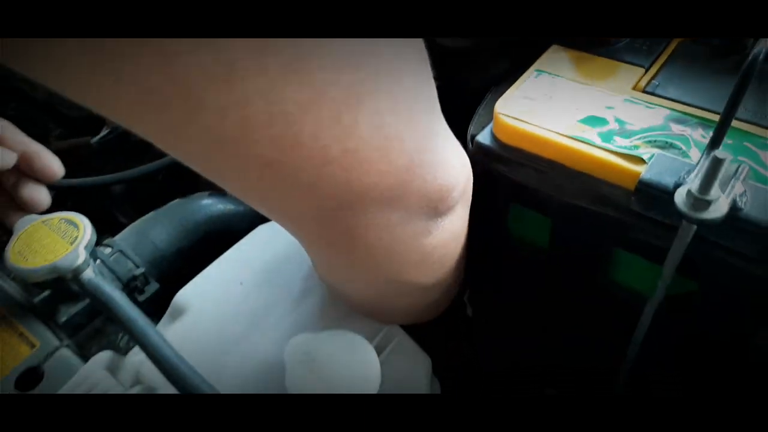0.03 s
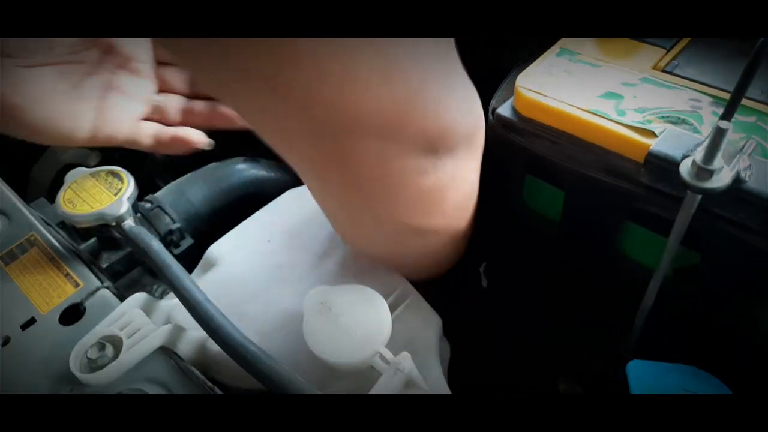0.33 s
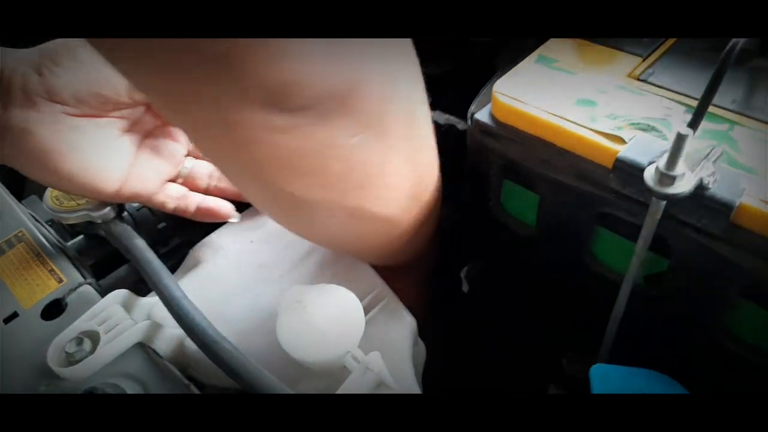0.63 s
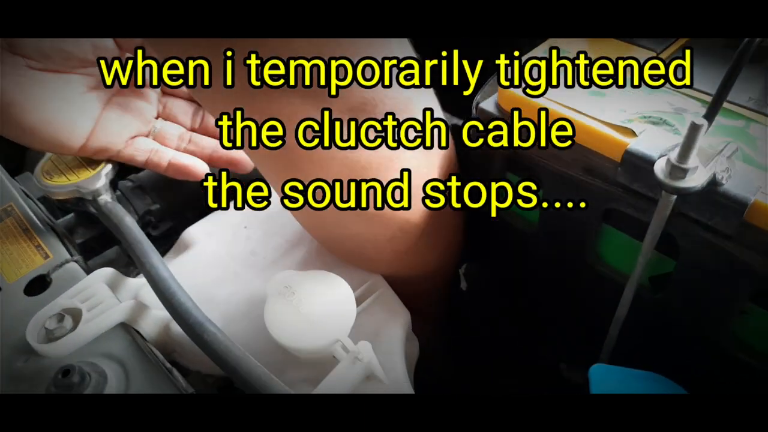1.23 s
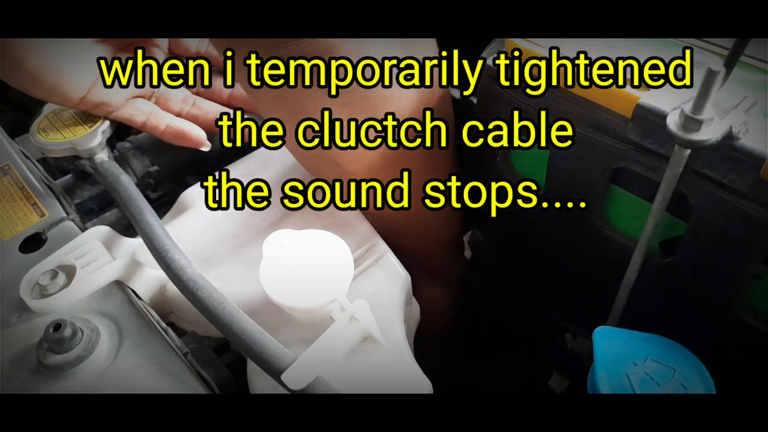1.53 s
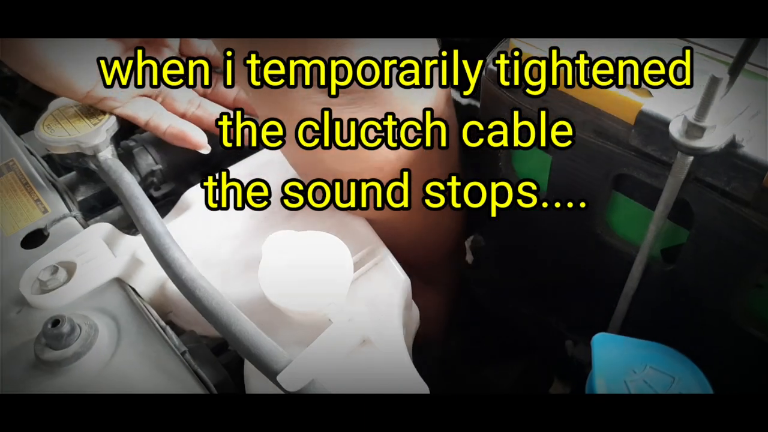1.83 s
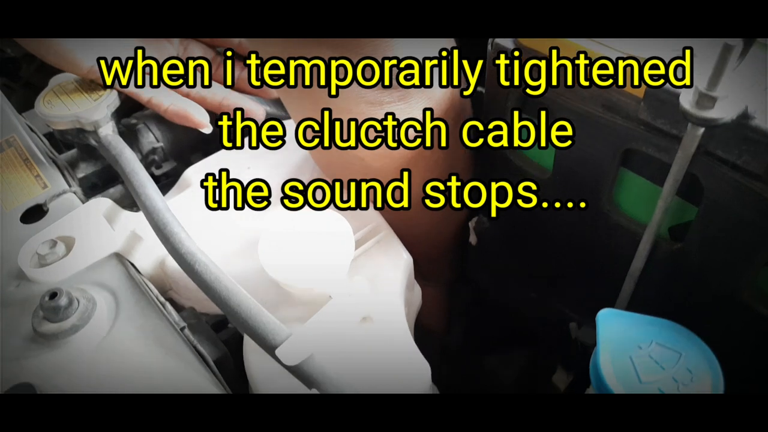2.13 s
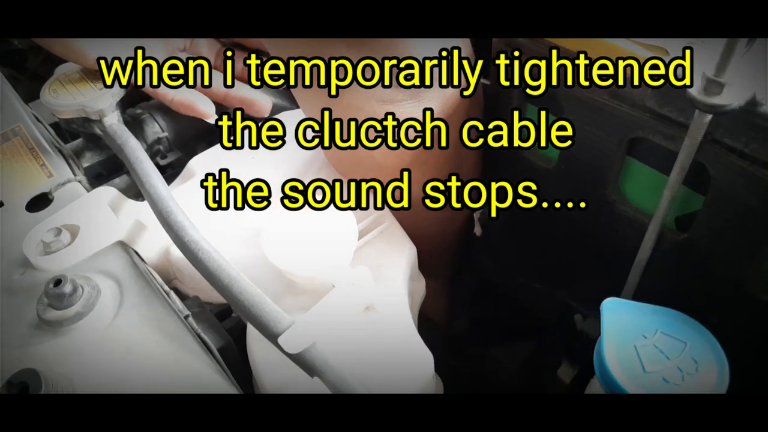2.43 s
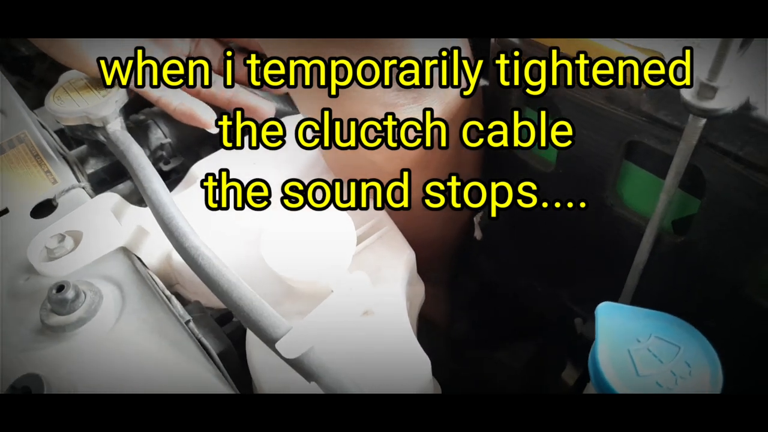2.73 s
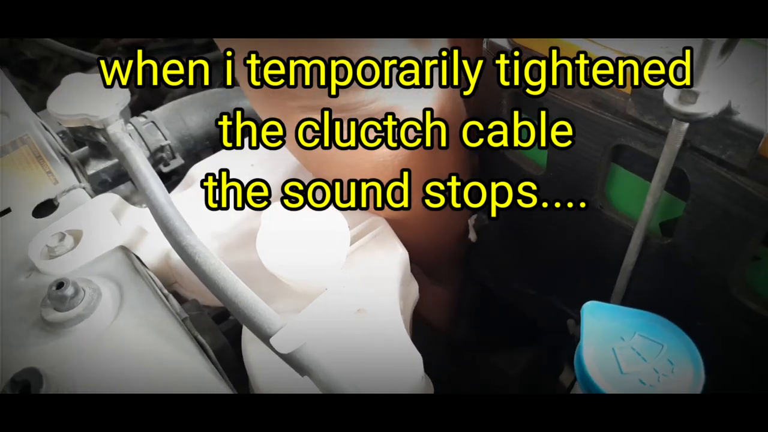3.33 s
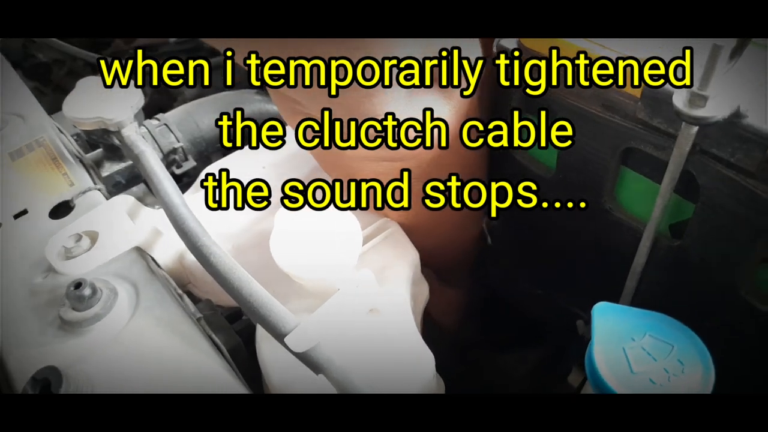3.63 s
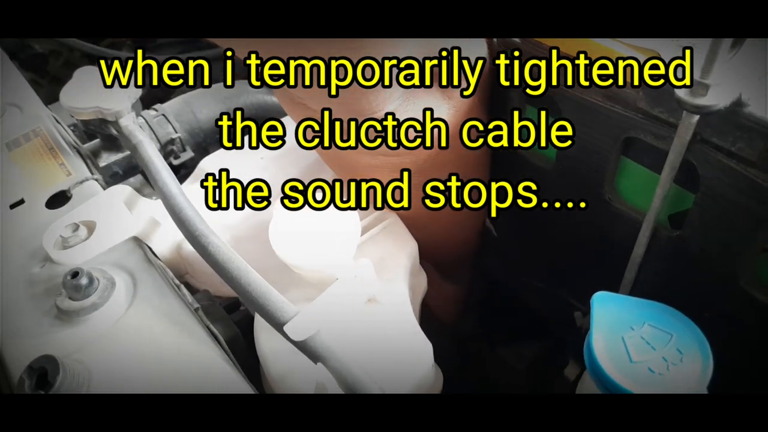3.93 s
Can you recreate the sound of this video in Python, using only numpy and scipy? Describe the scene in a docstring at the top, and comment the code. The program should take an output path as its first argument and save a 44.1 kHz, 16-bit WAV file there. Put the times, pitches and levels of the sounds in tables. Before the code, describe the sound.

Shrill squeal and hiss from an idling car engine stop, then chirp back for a moment.

```python
"""A small car engine idles under the open bonnet, close by: it hums, and rumbles and ticks at the
firing rate. From the start, friction in a dry bearing, probably the clutch's, sustains a squeal
near 3.7 kHz that flutters with every turn of the crank. Its rubbing hiss grows and changes colour
as the listener moves further over the engine. At about 2.6 s the cable is pulled tight and squeal
and hiss die away; near 3.6 s they return for a moment, and the engine idles on."""
import sys
import numpy as np
from scipy import signal
from scipy.fft import rfft, irfft
from scipy.io import wavfile
from scipy.ndimage import uniform_filter1d

SR = 44100
rng = np.random.default_rng(int(sys.argv[2]) if len(sys.argv) > 2 else 0)


def pcm_store(signal):
    """Save signal as 16-bit PCM."""
    levels = np.round(np.clip(np.atleast_2d(signal), -1, 1) * 32767)
    wavfile.write(sys.argv[1], SR, levels.astype(np.int16).T)


N = 176400

# Rotation rate of the crank: time_s, rate_hz
CRANK_RATE = [(0, 15.12), (.7, 15.06), (1.1, 14.88), (2.0, 14.84), (3.0, 14.95), (4.0, 14.95)]
# Envelope of the squeal: time_s, gain_db
SQUEAL_ENVELOPE = [(0, -26.5), (.5, -29.5), (.8, -25.5), (1.22, -24.5), (1.7, -24.5), (2.1, -27),
                   (2.48, -28.5), (2.55, -24), (2.59, -38.5), (2.65, -46), (2.8, -74), (3.54, -74),
                   (3.568, -34), (3.6, -27.5), (3.625, -33), (3.65, -27), (3.695, -39), (3.73, -31.5),
                   (3.775, -49), (3.87, -66)]
# Relative weights of the lines around the squeal's pitch: offset_in_crank_rates, left_db, right_db
SQUEAL_SIDEBANDS = [(-22, -29, -31), (-16, -17, -21), (-13, -21, -21), (-12, -16, -16), (-10, -21, -19),
                    (-9, -7, -9), (-8, -13, -15), (-7, -15, -18), (-6, -1, -5), (-5, -12, -12),
                    (-4, -10, -7), (-3, -11, -8), (-2, -3, -2), (-1, -14, -13), (0, -2, 0), (1, -3, -1),
                    (2, -21, -20), (3, -20, -11), (4, -18, -7), (5, -24, -16), (6, -22, -24), (8, -19, -20),
                    (13, -29, -28), (16, -23, -22), (18, -32, -30)]
# Moments when the bearing catches hardest: centre_s, pitch_hz, width_hz, level_db, half_length_s
BEARING_SCRAPES = [(1.217, 5050, 1100, -41.5, 0.15), (2.537, 5500, 250, -50, .009),
                   (3.603, 5520, 250, -42, .009)]
# Envelope of the rubbing hiss: time_s, gain_db
HISS_ENVELOPE = [(0, -43), (.85, -42), (1.2, -38.5), (1.6, -36.5), (2.25, -34.5), (2.48, -37), (2.55, -32),
                 (2.63, -52), (3.0, -75), (3.45, -50), (3.55, -44.5), (3.6, -37), (3.66, -40.5),
                 (3.74, -44), (3.82, -65)]
# Balance of the hiss: time_s, left_minus_right_db
HISS_BALANCE = [(0, -11.5), (.9, -7.5), (1.5, 2), (4, 2)]
# Spectra of the hiss before and after the listener moves: frequency_hz, relative_density_db
HISS_SPECTRUM_BEFORE = [(1500, -18), (3000, 1), (4200, -2), (4900, 5.5), (5250, -6), (5550, 2), (6400, -31),
                        (7300, 5), (8250, -9), (9200, 0.5), (12000, -2.5), (13800, -0.5), (15500, -21)]
HISS_SPECTRUM_AFTER = [(1500, 3), (3000, -1), (4200, 0), (4850, 6), (5250, -1), (5600, 5), (5900, -4.5),
                       (6200, 7), (6600, -5), (7300, 9), (8200, -9), (9200, 2), (12000, -2), (13800, 2.5),
                       (15500, -7.5)]
# Progress of that move: time_s, power_share_after
LISTENER_MOVE = [(1.0, 0.088), (1.6, 1)]
# Swelling and sinking of the main hum: time_s, level_db
HUM_ENVELOPE = [(0.0, -22), (0.02, -21.5), (0.58, -18.5), (1.05, -21.5), (1.18, -19), (1.49, -18.5),
                (1.71, -21.5), (2.21, -19.5), (2.52, -23.5), (2.88, -17.5), (3.51, -21.5), (3.54, -18.5),
                (3.97, -17), (4.0, -15.5)]
# Weaker tones of the engine and its fan: pitch_hz, level_db, left_minus_right_db, unsteady_share
ENGINE_TONES = [(67.2, -43, 17, 0.21), (112.6, -41, 17, .5), (156.2, -37, 0, 0.28), (181.4, -30, 5, 0.11),
                (243, -38.5, 6.5, 0.37), (307.6, -32.5, 15, 0.13), (458.6, -47, 5, 0.36),
                (614, -54, 8, 0.21), (1772, -58, 5, 0.3)]
# Spectra of the engine's rumble and of the valve gear's clatter: frequency_hz, relative_density_db
RUMBLE_SPECTRUM = [(25, -30), (42, -17), (60, -4), (80, -4), (130, 1), (190, -3.5), (280, -4.5),
                   (360, -10.5), (480, -14), (650, -18.5), (850, -18.5), (1100, -23), (1600, -22),
                   (2200, -21.5), (3000, -33.5), (4500, -52.5)]
CLATTER_SPECTRUM = [(1200, -9), (2500, 4.5), (3900, 4.5), (5200, -1), (7000, 2), (7900, -3), (8800, -15.5),
                    (10500, -7.5), (15000, -5.5)]
# Balance of rumble and clatter: frequency_hz, left_minus_right_db
ENGINE_BALANCE = [(60, -3), (110, 0.5), (200, 4), (380, 5), (690, 2), (1280, 4.5), (2360, 2), (4360, 4.5),
                  (8040, 5), (14800, 1.5)]
# Likeness of the broadband noises at the two ears: frequency_hz, correlation
EAR_CORRELATION = [(60, .99), (130, .98), (290, 0.93), (640, 0.49), (1400, -0.2), (3000, 0.031),
                   (15000, -0.036)]

SQUEAL_HZ, HUM_HZ, CUTOFF_HZ = 3705.3, 91.24, 15500
FIRINGS_PER_TURN = 1.5
FIRST_GRIP_S, FIRST_HISS_CREST_S, FIRST_TICK_S = 0.04314, 0.042, 0.028
PHASE_SCATTER_RAD = (2.4, 1.56)   # of the sidebands: left, right
EVENNESS, EVEN_OVER_S = 0.35, 0.008
GRIP_RISE_TURNS, GRIP_DEPTH_DB, GRIP_UNEVEN_DB = 0.14, 4.0, 0.73
RASP_DB, OCTAVE_DB, OCTAVE_RASP_DB = -9, -33.5, -35.5   # relative to the squeal's tone
HISS_FLUTTER_DEPTH = 0.14
RUMBLE_DB, THROB_DEPTH = -24.5, 0.083
CLATTER_DB, TICK_DEPTH, TICK_SHARPNESS = -40.5, 0.66, 2


def bearing_squeal():
    """Self-excited vibration: dry friction sustains a tone and its octave, each with a noisy rasp."""
    tone = bearing_tone()
    white = rng.standard_normal((2, 2, N))
    rasp = from_db(RASP_DB) * resonant_band(white[0], 3672, 3716, width_hz=233)
    octave = from_db(OCTAVE_DB) * unit_power((tone ** 2).real)
    octave_rasp = from_db(OCTAVE_RASP_DB) * resonant_band(white[1], 7360, 6860, width_hz=100)
    voice = unit_power(tone.real) + rasp + octave + octave_rasp
    return from_db(in_time(SQUEAL_ENVELOPE)) * bearing_grip() * voice


def bearing_tone():
    """Periodic modulation splits a tone into sidebands spaced at the crank rate; complex, stereo."""
    turn = np.exp(1j * crank_angle(FIRST_GRIP_S))
    orders, left_db, right_db = np.transpose(SQUEAL_SIDEBANDS)
    line = carrier(SQUEAL_HZ) * turn ** int(orders[0])
    tone = np.zeros((2, N), complex)
    for order in np.arange(orders[0], orders[-1] + 1):
        wandering = line * (1 + 0.34 * drift(rate_hz=1.25))
        for ear, weights_db in enumerate((left_db, right_db)):
            weight = from_db(np.interp(order, orders, weights_db))
            phase = PHASE_SCATTER_RAD[ear] * rng.normal()
            tone[ear] += wandering * weight * np.exp(1j * phase)
        line = line * turn   # one crank rate higher
    # Friction partly evens out the amplitude.
    power = uniform_filter1d(np.abs(tone) ** 2, int(EVEN_OVER_S * SR))
    relative_power = power / power.mean(axis=1, keepdims=True)
    return unit_power(tone / relative_power ** (EVENNESS / 2))


def bearing_grip():
    """Amplitude modulation: on each turn the grip rises quickly and releases slowly, a bit unevenly."""
    turn_fraction = crank_angle(FIRST_GRIP_S) / (2 * np.pi) % 1
    slack = np.interp(turn_fraction, [0, 1 - GRIP_RISE_TURNS, 1], [0, 1, 0])
    return from_db(-GRIP_DEPTH_DB * slack + GRIP_UNEVEN_DB * drift(rate_hz=3.5).real)


def bearing_scrapes():
    """Forced resonance: a higher mode of the bearing swells briefly where it catches hardest."""
    t, scrapes = np.arange(N) / SR, 0
    for centre_s, pitch_hz, width_hz, level_db, half_length_s in BEARING_SCRAPES:
        ringing = resonant_band(rng.standard_normal((2, N)), pitch_hz, pitch_hz, width_hz)
        swell = np.exp(-((t - centre_s) / half_length_s) ** 2)
        scrapes = scrapes + from_db(level_db) * swell * ringing
    return scrapes


def bearing_hiss():
    """Sliding friction radiates broadband noise, cresting once a turn; its colour depends on position."""
    once_a_turn = np.cos(crank_angle(FIRST_HISS_CREST_S))
    flutter = 1 + HISS_FLUTTER_DEPTH * once_a_turn + 0.2 * drift(rate_hz=36).real
    moved = in_time(LISTENER_MOVE)
    before = np.sqrt(1 - moved) * stereo_noise(HISS_SPECTRUM_BEFORE)
    after = np.sqrt(moved) * stereo_noise(HISS_SPECTRUM_AFTER)
    return from_db(in_time(HISS_ENVELOPE)) * pan(in_time(HISS_BALANCE)) * flutter * (before + after)


def engine_hum():
    """Periodic motion of engine and fan gives a line spectrum: a main hum and weaker wavering tones."""
    main_tone = carrier(HUM_HZ) * (1 + 0.056 * drift(rate_hz=1.3))
    hum = from_db(in_time(HUM_ENVELOPE)) * pan(balance_db=3.5) * main_tone.real
    for pitch_hz, level_db, balance_db, unsteady in ENGINE_TONES:
        tone = carrier(pitch_hz) * (1 - unsteady + unsteady * drift(rate_hz=2.0))
        hum = hum + from_db(level_db) * pan(balance_db) * unit_power(tone).real
    return np.sqrt(2) * hum   # the real part carries half the power


def engine_noise():
    """Noise modulated at the firing rate: the rumble throbs and the valve gear ticks."""
    firing = np.cos(FIRINGS_PER_TURN * crank_angle(FIRST_TICK_S))
    throb = 1 + THROB_DEPTH * firing
    ticks = unit_power(1 + TICK_DEPTH * np.exp(TICK_SHARPNESS * (firing - 1)))
    rumble = from_db(RUMBLE_DB) * throb * stereo_noise(RUMBLE_SPECTRUM, ENGINE_BALANCE)
    clatter = from_db(CLATTER_DB) * ticks * stereo_noise(CLATTER_SPECTRUM, ENGINE_BALANCE)
    return rumble + clatter


def crank_angle(zero_s):
    """Phase is the integral of rate: the crank's angle in radians, passing zero near zero_s."""
    rate_hz = in_time(CRANK_RATE)
    return 2 * np.pi * (np.cumsum(rate_hz) / SR - zero_s * rate_hz[0])


def carrier(hz):
    """Simple harmonic motion as a rotating phasor with a random starting phase."""
    return np.exp(2j * np.pi * (hz * np.arange(N) / SR + rng.random()))


def drift(rate_hz):
    """Low-pass filtered noise gives a slow complex fluctuation of unit power."""
    step = 100   # samples between computed points
    pole, count = np.exp(-2 * np.pi * rate_hz * step / SR), N // step + 2
    white = rng.standard_normal((2, 2 * count))
    real, imaginary = signal.lfilter([1], [1, -2 * pole, pole * pole], white)[:, count:]
    return np.interp(np.arange(N) / step, np.arange(count), unit_power(real + 1j * imaginary))


def resonant_band(x, narrow_hz, broad_hz, width_hz):
    """Two damped resonators in series, the second twice as wide, pass a band scaled to unit power."""
    for hz, bandwidth_hz in ((narrow_hz, width_hz), (broad_hz, 2 * width_hz)):
        radius = np.exp(-np.pi * bandwidth_hz / SR)
        feedback = [1, -2 * radius * np.cos(2 * np.pi * hz / SR), radius * radius]
        x = signal.lfilter([1, 0, -1], feedback, x)
    return unit_power(x)


def stereo_noise(spectrum, balance=None):
    """Interaural correlation: coloured noise of unit power, alike at both ears in the bass only."""
    hz = np.fft.rfftfreq(N, 1 / SR) + 1
    mid, side = rfft(rng.standard_normal((2, N)))
    correlation = at_hz(EAR_CORRELATION, hz)
    ears = np.sqrt(1 + correlation) * mid + np.sqrt(1 - correlation) * side * [[1], [-1]]
    if balance is not None:
        ears = ears * pan(at_hz(balance, hz))
    coloured = ears * from_db(at_hz(spectrum, hz)) * (hz < CUTOFF_HZ)
    return unit_power(irfft(coloured, N))


def pan(balance_db):
    """Interaural level difference, left minus right, as a pair of gains."""
    return from_db(np.array([[.5], [-.5]]) * balance_db)


def in_time(rows):
    """Linear interpolation of (time_s, value) rows at every sample."""
    return np.interp(np.arange(N) / SR, *np.transpose(rows))


def at_hz(rows, hz):
    """Interpolation of (frequency_hz, value) rows on a logarithmic frequency axis."""
    frequency_hz, value = np.transpose(rows)
    return np.interp(np.log(hz), np.log(frequency_hz), value)


def from_db(db):
    """Decibels as an amplitude ratio."""
    return 10 ** (np.asarray(db) / 20)


def unit_power(x):
    """Normalisation to a mean square of one."""
    return x / np.sqrt(np.mean(np.abs(x) ** 2) + 1e-20)


def scene():
    """Superposition: the sound pressures of bearing and engine add."""
    return bearing_squeal() + bearing_hiss() + engine_hum() + engine_noise() + bearing_scrapes()


def record(dry):
    """Band limiting: a steep elliptic low-pass filter removes the highest treble."""
    return signal.sosfilt(signal.ellip(12, .1, 90, CUTOFF_HZ, fs=SR, output="sos"), dry)


dry = scene()
out = record(dry)
pcm_store(out)
```